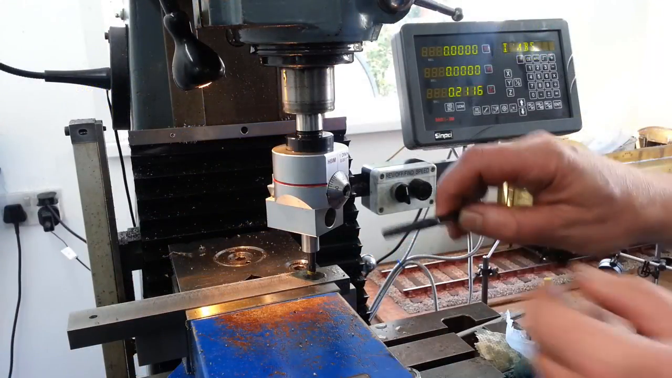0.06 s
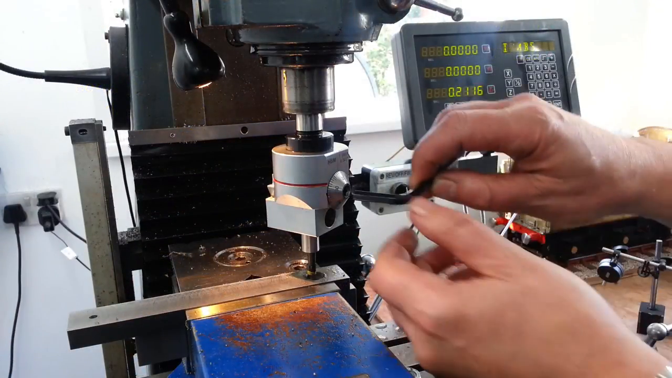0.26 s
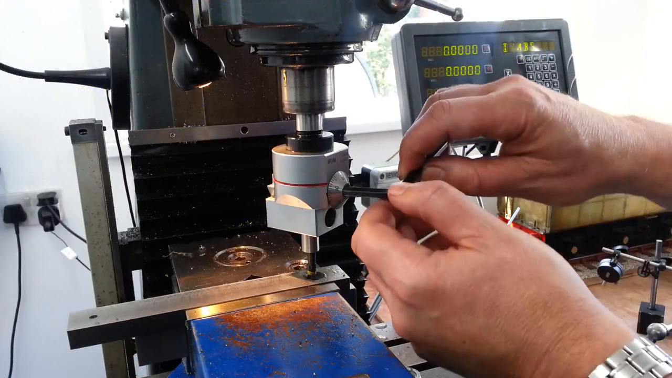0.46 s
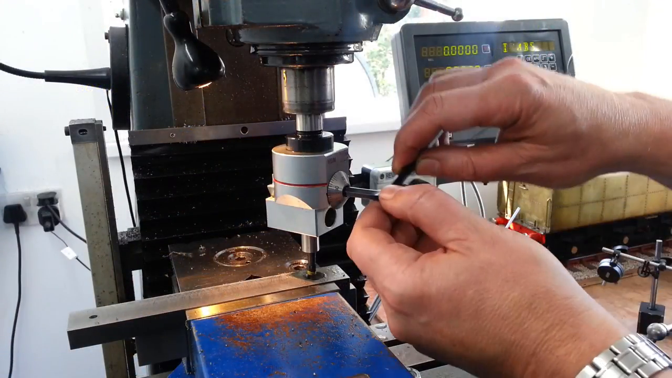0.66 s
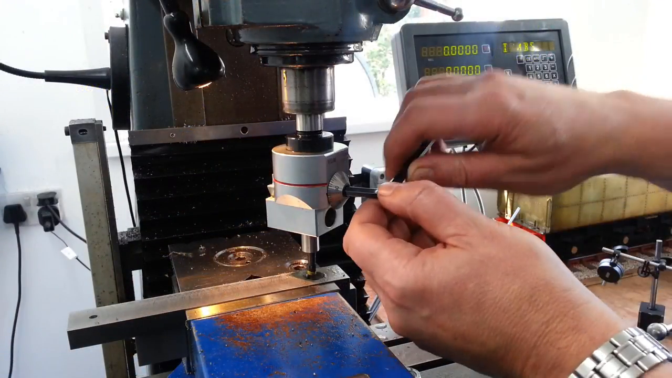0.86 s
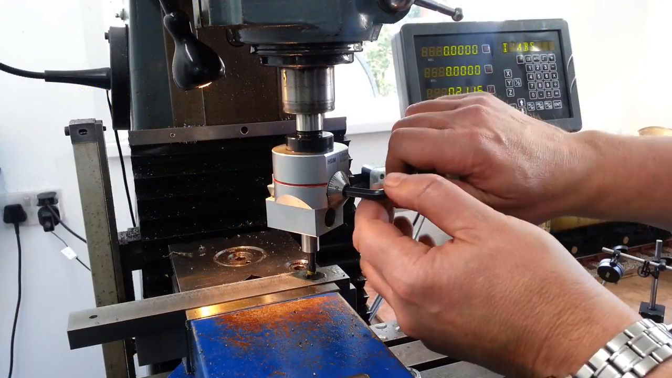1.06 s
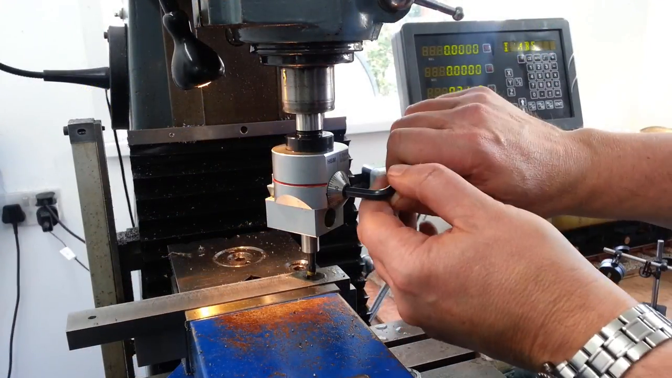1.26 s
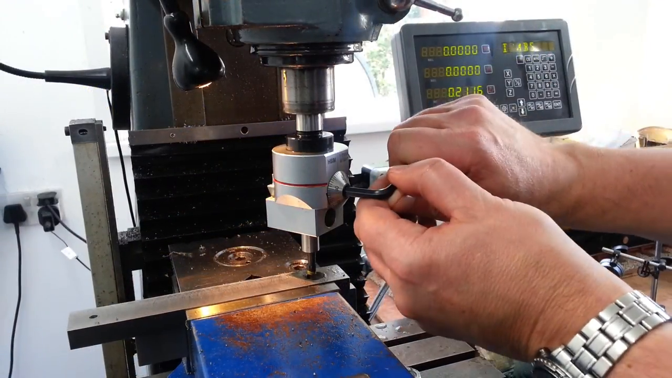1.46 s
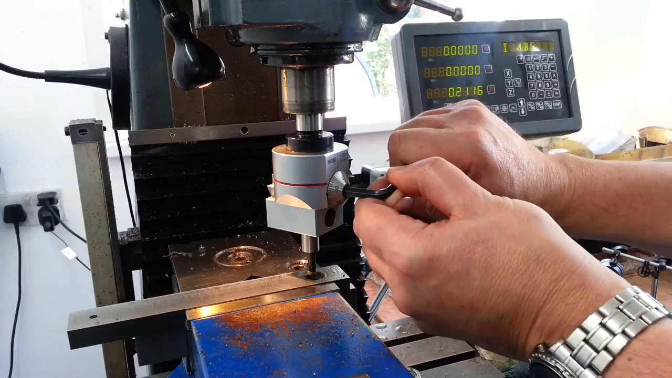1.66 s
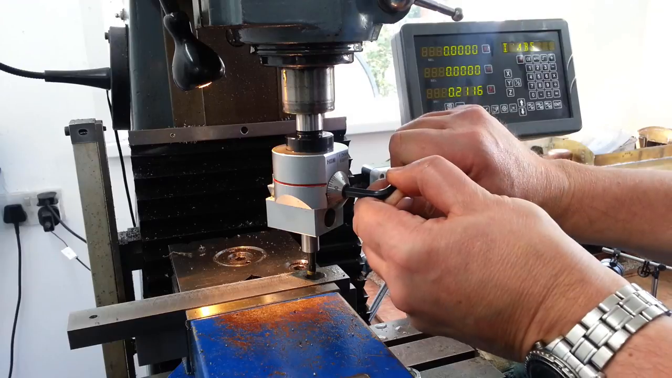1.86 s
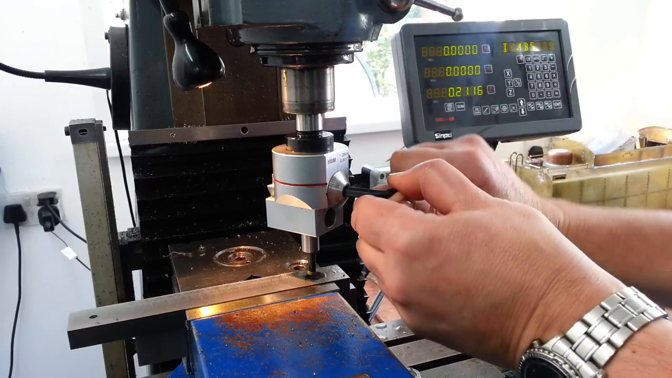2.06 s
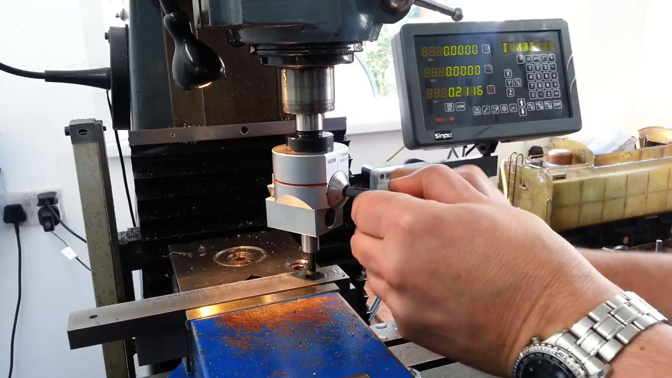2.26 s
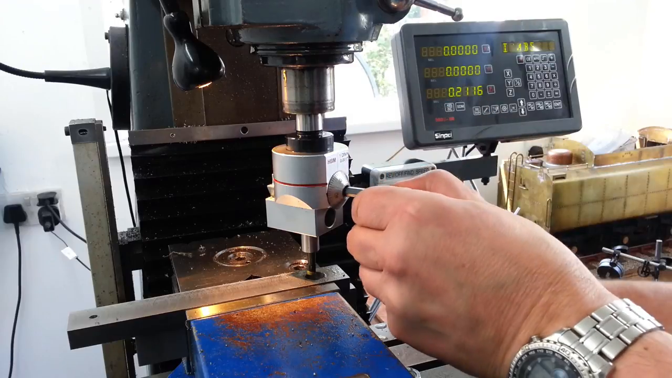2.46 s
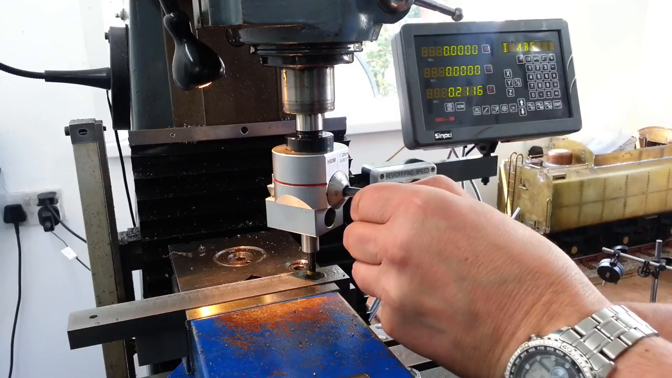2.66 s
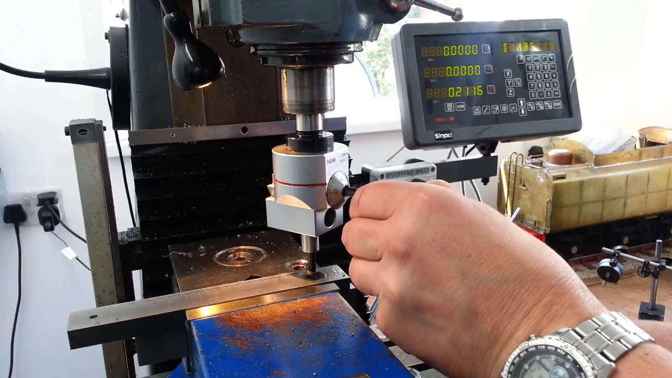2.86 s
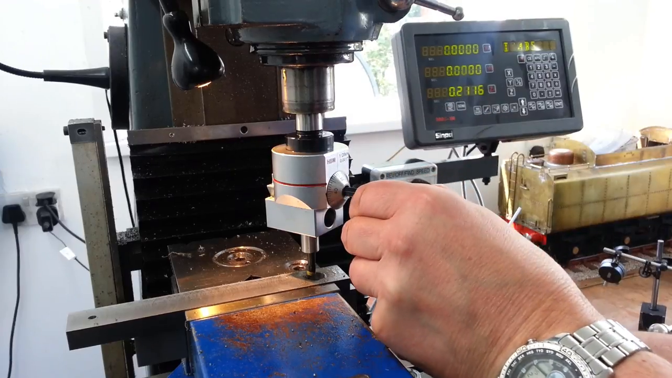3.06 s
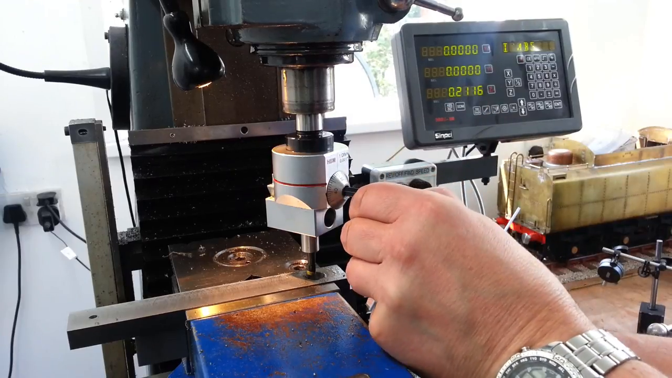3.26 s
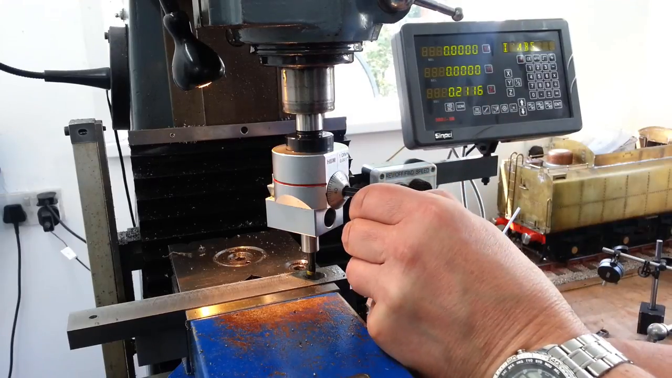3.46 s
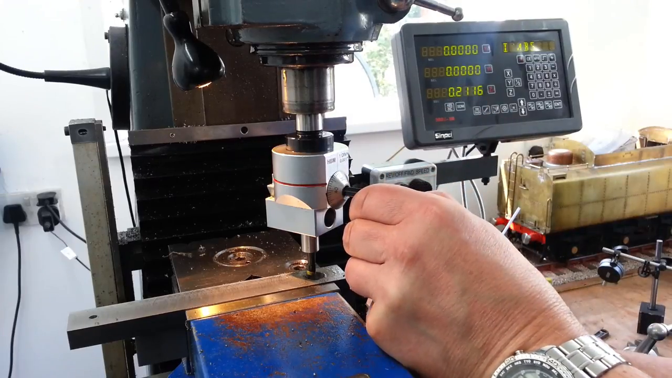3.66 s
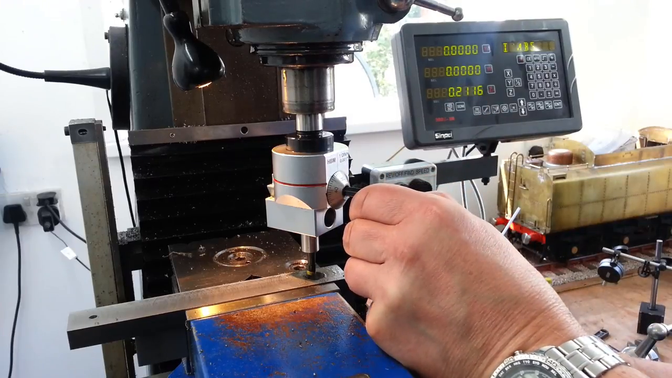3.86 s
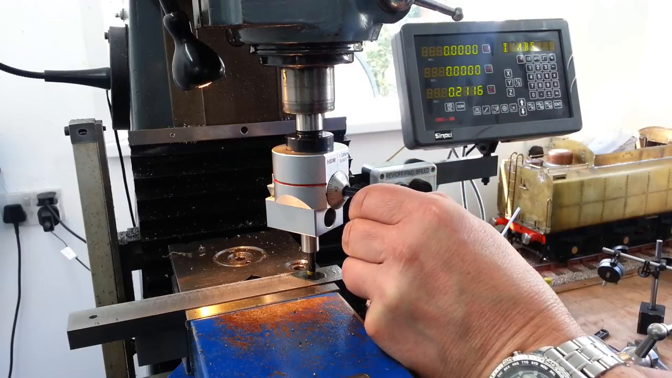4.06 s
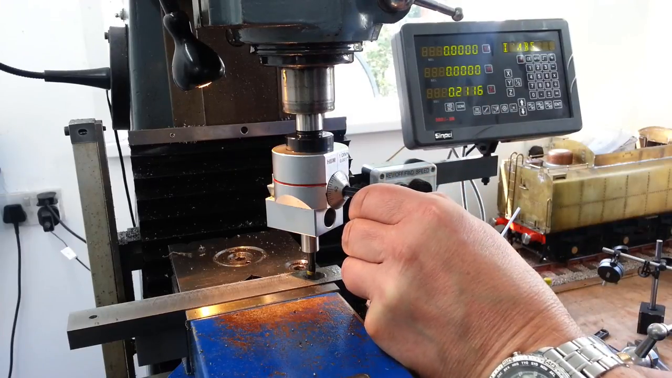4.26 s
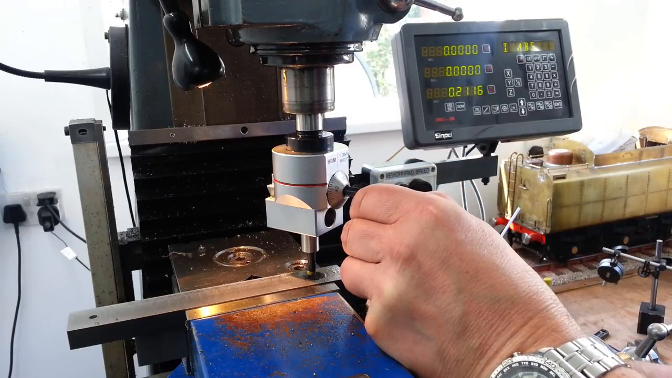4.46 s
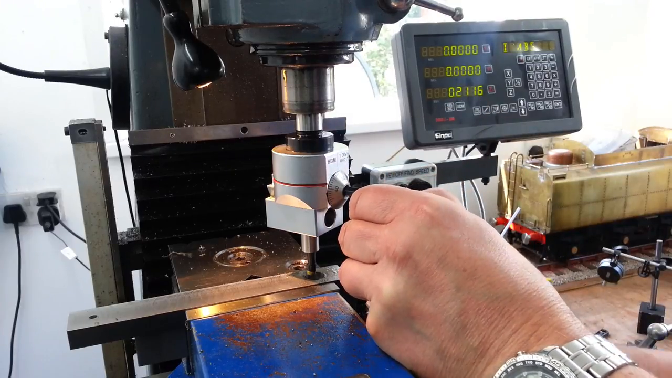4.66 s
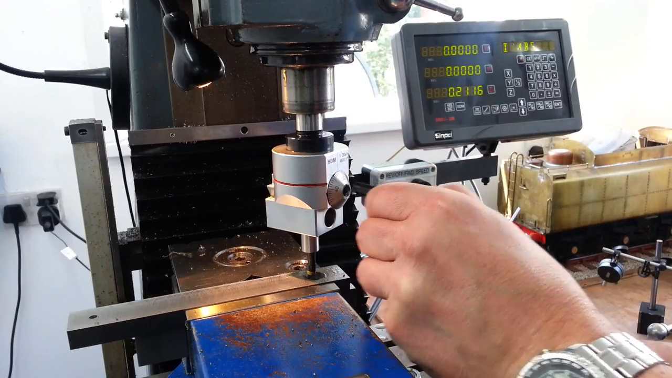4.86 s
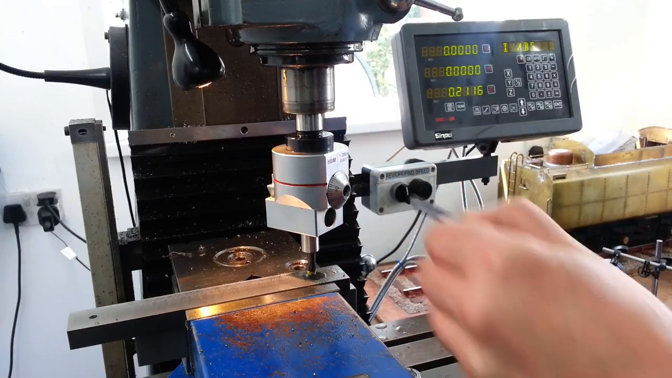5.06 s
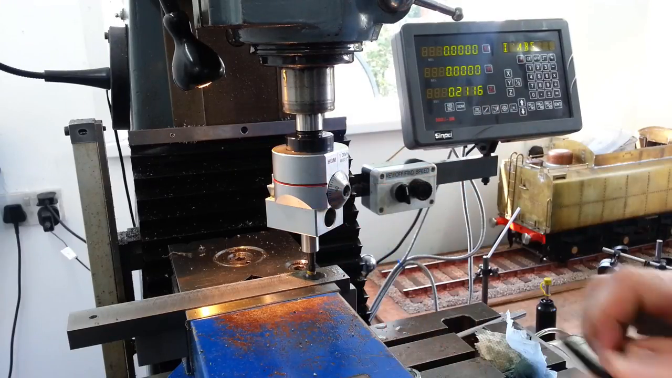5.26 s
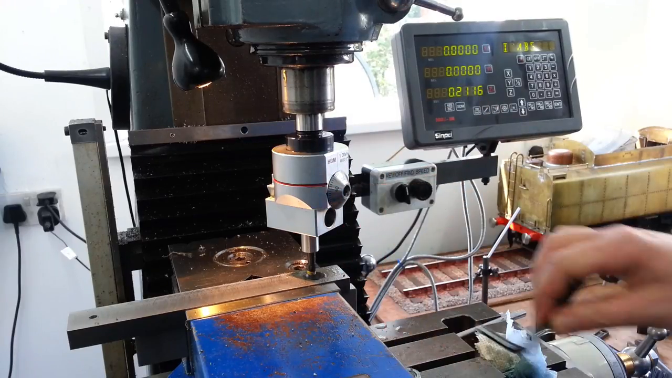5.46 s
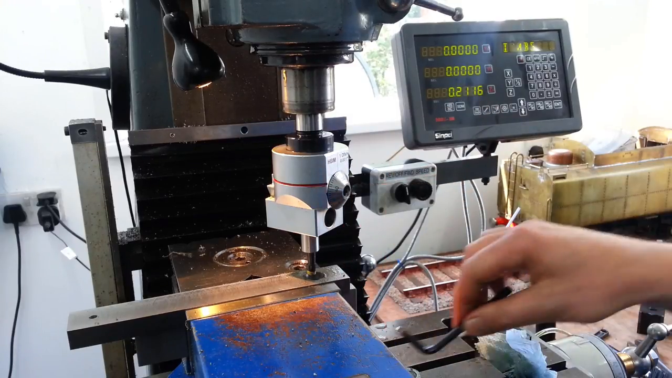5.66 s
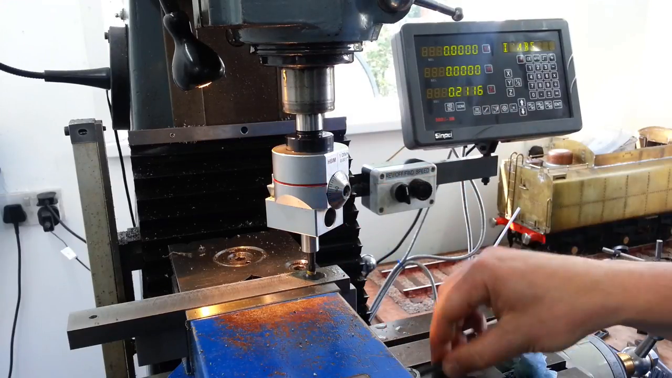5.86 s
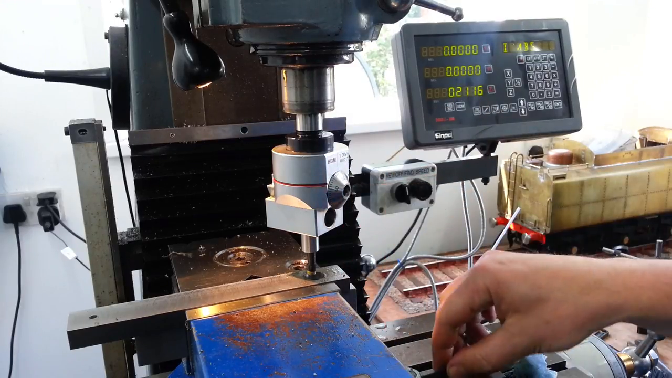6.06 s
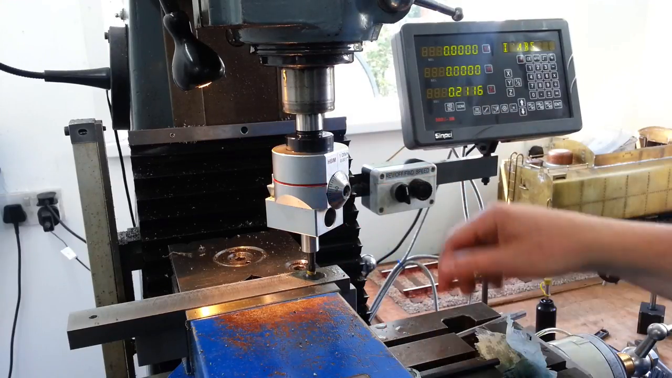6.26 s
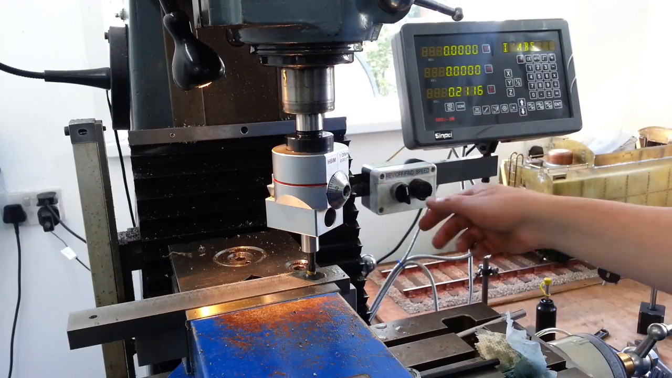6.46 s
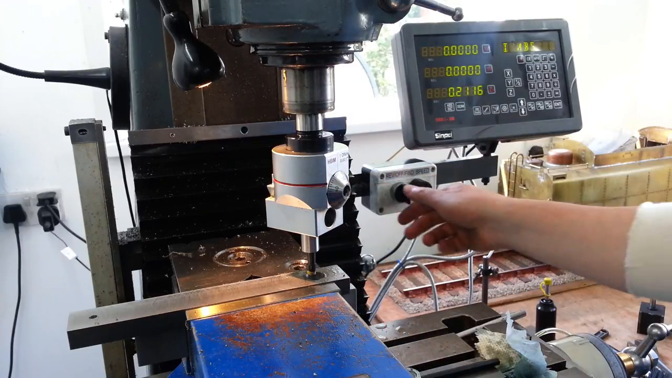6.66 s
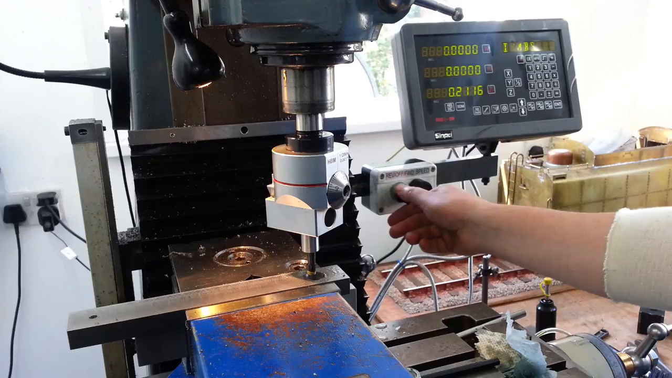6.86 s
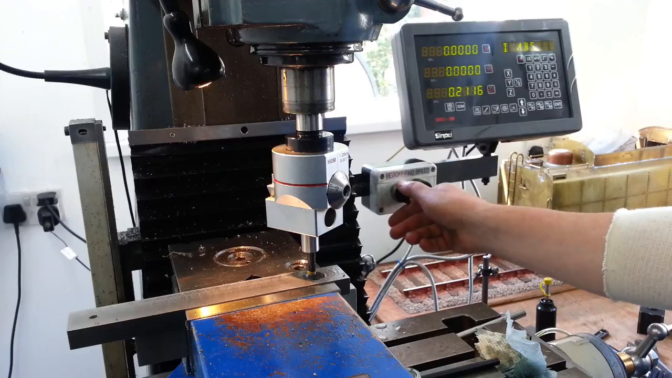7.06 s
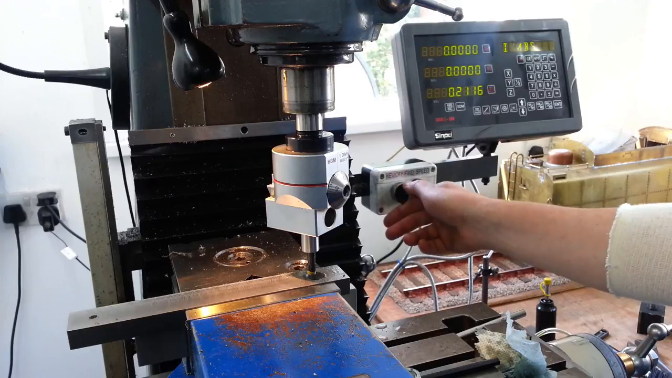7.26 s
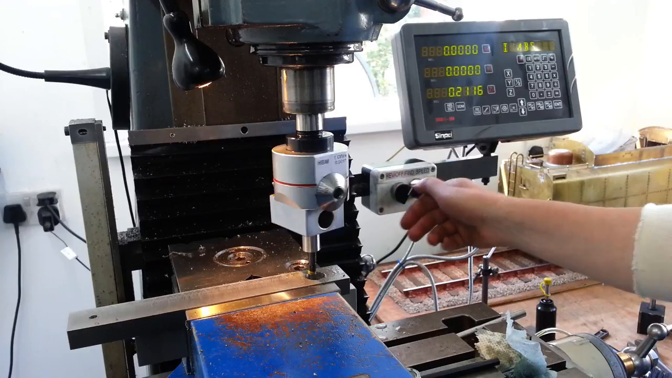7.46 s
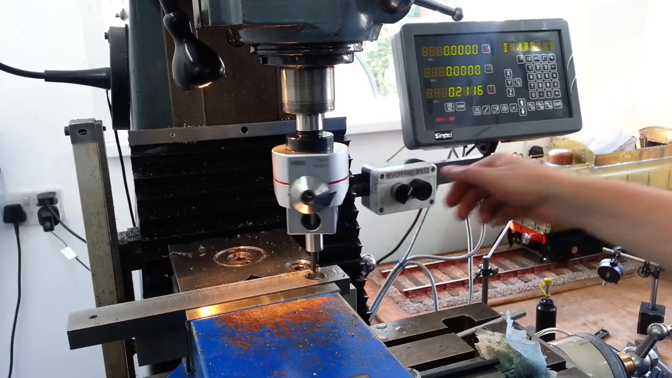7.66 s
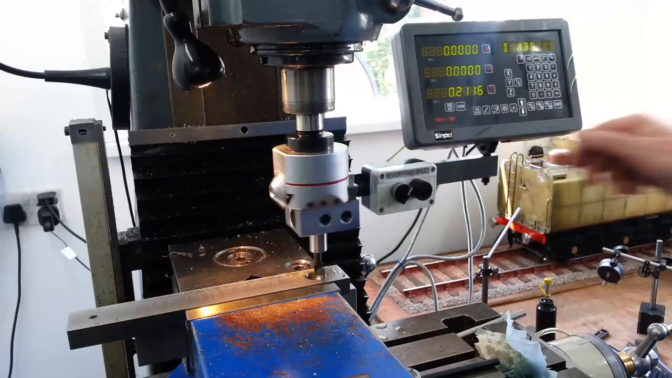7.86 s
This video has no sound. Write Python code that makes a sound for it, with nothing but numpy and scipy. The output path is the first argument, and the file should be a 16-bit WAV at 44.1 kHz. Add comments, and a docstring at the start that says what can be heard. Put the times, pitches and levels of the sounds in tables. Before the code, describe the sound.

A milling machine hums faintly in a small workshop. A hex key clicks against steel a few times, with soft hand bumps and arm rustle. After a lull it clicks again, then drops on the steel table with a short ringing bounce. A switch turns, a contactor snaps loudly, and a thin high whine begins as the gears knock into mesh and rumble. The sound is in stereo, with a short room echo.

```python
"""A milling machine idles in a small workshop, its iron cores humming with the mains.
Arms shuffle and hands bump as a hex key clicks into the boring head; later the key drops on the steel
table, bouncing and ringing. A switch is turned, a contactor slams and rings its cabinet, and the
inverter starts to whine. The spindle creeps, then the gears knock into mesh and run with a rumble."""
import sys
import numpy as np
from scipy import signal
from scipy.fft import rfft, irfft, next_fast_len
from scipy.io import wavfile
from scipy.ndimage import map_coordinates

SR = 44100
rng = np.random.default_rng(int(sys.argv[2]) if len(sys.argv) > 2 else 0)


def master(y):
    """Save y as 16-bit WAV."""
    cut = np.clip(np.atleast_2d(y).T, -1, 1)
    pcm = np.round(cut * 32767)  # scale
    wavfile.write(sys.argv[1], SR, pcm.astype(np.int16))


N = 349704
TIME = np.arange(N) / SR


def from_db(db):
    """Decibels to gain."""
    return 10 ** (np.asarray(db) / 20)


def rms_one(x):
    """Scale to rms 1."""
    return x / np.sqrt(np.mean(x ** 2) + 1e-20)


def pan(db):
    """Constant-power gains for a level difference; positive leans left."""
    return rms_one(from_db(np.array([[.5], [-.5]]) * db))


def at_hz(points, hz):
    """Read a curve on a log-frequency axis."""
    freqs, values = np.transpose(points)
    return np.interp(np.log(np.maximum(hz, 1)), np.log(freqs), values)


def ramp(start_s, rise_s):
    """Linear fade from 0 to 1, then hold."""
    return np.clip((TIME - start_s) / rise_s, 0, 1)


def since(start_s):
    """Seconds gone by after a cue, 0 before it."""
    return np.maximum(TIME - start_s, 0)


def drift(rate_hz):
    """Modulator that glides between random values of spread 1."""
    knots = rng.standard_normal(N // 40)
    return map_coordinates(knots, [TIME * rate_hz], order=1, mode="wrap")


def convolve(x, response):
    """Pass a signal through an impulse response."""
    return signal.oaconvolve(np.atleast_2d(x), np.atleast_2d(response), axes=1)[:, :N]


def colour(x, spectrum, size=4096):
    """Minimum-phase EQ of unit energy: the curve sets only the tone."""
    cepstrum = irfft(np.log(from_db(at_hz(spectrum, np.fft.rfftfreq(size, 1 / SR)))))
    causal = (np.arange(size) > 0) & (np.arange(size) < size // 2)
    response = irfft(np.exp(rfft(2 * cepstrum * causal)))
    return convolve(x, response / np.linalg.norm(response))


def clicks(times, db):
    """One impulse for each contact."""
    out = np.zeros(N)
    out[np.round(np.asarray(times) * SR).astype(int)] = from_db(db)
    return out


def ring(force, hz, t60):
    """One mode: each impulse starts a decaying sine."""
    radius, angle = from_db(-60 / (t60 * SR)), 2 * np.pi * hz / SR
    return signal.lfilter([.5, 0, -.5], [1, -2 * radius * np.cos(angle), radius ** 2], force + 1e-18)


def decay(force, t60):
    """Envelope of a vibration that stores each contact's energy and steadily loses it."""
    retained = from_db(-120 / (t60 * SR))
    return np.sqrt(signal.lfilter([1 - retained], [1, -retained], force ** 2 + 1e-18))


# Stereo image of the room: (frequency [Hz], left-right correlation [0-1])
ROOM_CORRELATION = [(40, 0.35), (130, 0.32), (300, 0.44), (640, 0.34), (1400, 0), (14000, 0.013)]
def stereo_noise(size):
    """Diffuse white noise: partly centred in the bass, fully wide in the treble."""
    fast = next_fast_len(size)
    mid, side = rfft(rng.standard_normal((2, fast)))
    alike = at_hz(ROOM_CORRELATION, np.fft.rfftfreq(fast, 1 / SR))
    return irfft(np.sqrt(1 + alike) * mid + np.sqrt(1 - alike) * side * [[1], [-1]], fast)[:, :size]


# Reverb time of the workshop: (frequency [Hz], T60 [s])
ROOM_DECAY = [(150, 0.54), (530, 0.94), (1400, 0.41), (3700, 0.38), (9000, 0.38), (14000, 0.2)]
def workshop(dry, wet_db, size=32768):
    """Direct sound plus reflections that build within milliseconds and die sooner in the treble."""
    hz, times, cells = signal.stft(stereo_noise(size), SR, nperseg=256)
    tail = signal.istft(cells * from_db(-60 * times / at_hz(ROOM_DECAY, hz)[:, None]), SR)[1]
    tail *= np.clip(TIME[:tail.shape[1]] / .006 - .3, 0, 1)
    tail /= np.linalg.norm(tail, axis=1, keepdims=True)
    return dry + from_db(wet_db) * convolve(dry.mean(axis=0), tail)


def rattle(force, t60, wet_db):
    """A dense noise burst on each contact, with a room tail that fades band by band."""
    size = next_fast_len(N)
    spectrum, hz = rfft(stereo_noise(size)), np.fft.rfftfreq(size, 1 / SR)
    centres, room_t60s = np.transpose(ROOM_DECAY)
    tail = np.zeros((2, N))
    for band, room_t60 in zip(np.eye(len(centres)), room_t60s):
        band_noise = irfft(spectrum * at_hz(np.c_[centres, band], hz), size)[:, :N]
        tail += band_noise * decay(force, room_t60)
    return stereo_noise(N) * decay(force, t60) + from_db(wet_db) * tail


# Strong hum partials: (multiple of twice the mains rate, level [dB], pan [dB])
CORE_PARTIALS = [(1, -74, -8), (2, -58, 0), (3, -66, 1), (4, -63, -2), (5, -68, -8), (6, -55, -5),
                 (8, -70, 4), (11, -70, 10), (13, -71, 0), (15, -72, 0), (17, -74, -4), (18, -73, -4),
                 (25, -69, 3), (26, -70, 4), (27, -72, -5), (28, -64, -4), (29, -74, -10), (30, -73, 7),
                 (32, -66, 3), (34, -73, 3), (35, -68, -10), (36, -68, -10), (37, -71, -6), (38, -73, -7)]
# Buzz of the weaker partials: (frequency [Hz], level [dB])
CORE_BUZZ = [(700, -84), (1500, -78.5), (2200, -79), (3300, -71), (4000, -81.5), (4600, -80), (6000, -89.5),
             (7300, -95)]
# Standing waves make the left side lag: (frequency [Hz], delay [s])
LEFT_DELAY = [(600, .00014), (800, .00043), (2600, .00049), (2800, .00038), (3200, .00045), (3400, .00028)]
def mains_hum(mains_hz=49.924, trim_db=.12, odd_db=-16, waver_db_at_1khz=.9):
    """Iron cores flex twice per mains cycle; panels favour some partials, moving arms make them waver."""
    strong = {2 * round(multiple): (db, side) for multiple, db, side in CORE_PARTIALS}
    hand_near = ramp(.63, .46) - ramp(5.5, .46)
    out = np.zeros((2, N))
    for harmonic in [*range(2, 96), *range(96, 148, 2)]:
        hz = harmonic * mains_hz
        buzz_db = at_hz(CORE_BUZZ, hz) + odd_db * (harmonic % 2)
        db, pan_db = strong.get(harmonic, (buzz_db, rng.normal(0, 5)))
        phase = 2 * np.pi * (hz * TIME + rng.random())
        # standing waves scatter the stereo phase of the weak partials
        lag = 2 * np.pi * hz * at_hz(LEFT_DELAY, hz) + rng.normal(0, 2.7) * (harmonic not in strong)
        waver_db = waver_db_at_1khz * np.sqrt(hz / 1000) * rng.standard_normal(24)
        gain = np.interp(TIME, np.linspace(0, N / SR, len(waver_db)), from_db(db + trim_db + waver_db))
        if harmonic == 12:   # the loudest partial loses its boost while the hand holds the key
            gain *= from_db(2.5 * (1 - hand_near))
        out += np.sqrt(2) * pan(pan_db) * gain * np.sin([phase - lag, phase])
    return out


# Soft rustle of the arms: (frequency [Hz], level [dB])
SHUFFLE_EQ = [(100, -35), (250, 2.5), (450, 2), (700, 1), (1050, 0.5), (1500, -11), (4000, -12),
              (9000, -35)]
def arm_shuffle(reach_db=-56, settle_db_per_s=2.1, rest_db=-62.5, flutter_db=2.5):
    """Arms shuffle most as they reach in, then settle."""
    level_db = np.maximum(reach_db - settle_db_per_s * TIME, rest_db)
    return from_db(level_db + flutter_db * drift(52)) * colour(stereo_noise(N), SHUFFLE_EQ)


# Room tone: (frequency [Hz], level [dB])
AIR_EQ = [(25, -14), (55, -13.5), (110, 0.5), (170, 0), (300, 3.5), (450, -6.5), (700, -17), (1100, -3),
          (1500, -8.5), (3500, -12), (5000, -14.5), (6300, -19.5), (7500, -15), (14000, -14.5)]
def room_air(level_db=-58):
    """A steady bed of air and hiss."""
    return from_db(level_db) * colour(stereo_noise(N), AIR_EQ)


def key_ring(modes, times, ring_db, tilt_db):
    """The key's bending modes; each contact rings with its own brightness, pivoting at 6 kHz."""
    out = np.zeros((2, N))
    for hz, db, t60, pan_db in modes:
        force = clicks(times, ring_db + db + tilt_db * np.log2(hz / 6000))
        out += pan(pan_db) * ring(force, hz, t60)
    return out


# Key touching the socket: (time [s], click level [dB], ring level [dB], ring tilt [dB/octave])
SOCKET_HITS = [(0.347, -14, -34, -9.5), (0.4927, -22, -42, -14.5), (0.498, -17, -45, -13),
               (.508, -11.5, -41, -11), (0.7969, -9.5, -46, -7), (4.816, -29, -51, -10),
               (4.829, -19, -34, 7), (4.8348, -16, -34, 7)]
# Bright steel-on-steel click: (frequency [Hz], level [dB])
SOCKET_EQ = [(100, -83), (500, -51), (1300, 1), (1900, 10), (3000, 11.5), (4400, 14), (5800, 4),
             (7000, 5.5), (8400, 10), (9700, 3), (12000, -5), (14400, 6.5)]
# Ring of the held key: (frequency [Hz], level [dB], T60 [s], pan [dB])
HELD_KEY_MODES = [(1860, -28.5, 0.074, -2), (2970, -12, 0.034, -2), (3430, -6.5, 0.031, 4),
                  (4070, -7, 0.095, 0), (4170, -10.5, .1, 0), (4840, -18.5, 0.06, 0),
                  (7900, -7.5, 0.063, 0), (8370, -8, 0.082, 0), (8560, -12, 0.1, 0), (8850, -16, 0.098, -2)]
def key_in_socket():
    """The key clicks and rings briefly against the boring head, going in and coming out."""
    times, click_db, ring_db, tilt_db = np.transpose(SOCKET_HITS)
    click = colour(rattle(clicks(times, click_db), t60=.016, wet_db=-.5), SOCKET_EQ)
    return click + workshop(key_ring(HELD_KEY_MODES, times, ring_db, tilt_db), wet_db=-2.5)


# Knocks of the hands: (time [s], level [dB])
HAND_HITS = [(.355, -21.5), (0.504, -15.5), (.645, -16.5), (.805, -15.5), (3.549, -18)]
# Their dull body: (frequency [Hz], level [dB])
HAND_EQ = [(100, -25), (250, -1.5), (450, 6), (700, 1), (900, 0.5), (1300, -14), (4000, -28), (9000, -40)]
def hand_bumps():
    """Hands bump the machine with soft, lingering thuds."""
    force = clicks(*np.transpose(HAND_HITS))
    return colour(stereo_noise(N) * decay(force, t60=.56), HAND_EQ)


# Bounces: (time [s], click level [dB], flatwise ring [dB], edgewise ring [dB], ring tilt [dB/octave])
TABLE_BOUNCES = [(5.7787, -12.5, -26, -35, 0.5), (5.829, -27, -50, -41, -9.5),
                 (5.843, -32, -44.5, -39.5, -9.5), (5.9046, -30, -40, -43, -4),
                 (5.9348, -3, -31, -20.5, 6.5), (5.953, -3, -29, -33.5, -4)]
# Clack on the table: (frequency [Hz], level [dB])
TABLE_EQ = [(100, -51), (500, -4.5), (1300, -6.5), (1900, -3.5), (3000, 1.5), (4400, 1.5), (6000, -10),
            (8400, 5), (10000, -2), (14400, 0.5)]
# The key bending across its plane, then within it: (frequency [Hz], level [dB], T60 [s], pan [dB])
KEY_FLATWISE = [(1828, -16, 0.099, -1), (4016, -5, 0.11, 20), (4080, -14, 0.077, 4), (8260, -9, 0.067, 17),
                (8850, -7, 0.069, 4)]
KEY_EDGEWISE = [(2968, 3, 0.072, -10), (3054, -6, 0.053, 0), (7880, -8, 0.18, 7), (14410, 4, 0.1, 16)]
def key_drop():
    """The L-shaped key bounces on the steel table; its ring depends on which way it lands."""
    times, click_db, flatwise_db, edgewise_db, tilt_db = np.transpose(TABLE_BOUNCES)
    clack = colour(rattle(clicks(times, click_db), t60=.07, wet_db=1.3), TABLE_EQ)
    flatwise = key_ring(KEY_FLATWISE, times, flatwise_db, tilt_db)
    edgewise = key_ring(KEY_EDGEWISE, times, edgewise_db, tilt_db)
    return clack + workshop(flatwise + edgewise, wet_db=.5)


# Switch detents, then the contactor slamming and bouncing: (time [s], level [dB])
SWITCH_CONTACTS = [(6.765, -27), (6.77, -21.5), (6.931, -26.5), (7.186, 4), (7.189, 10), (7.194, -2.5),
                   (7.2045, 6), (7.216, 3.5), (7.358, -16), (7.536, -23)]
# Snap of the housing: (frequency [Hz], level [dB])
HOUSING_EQ = [(60, -55), (190, -7.5), (300, -24), (460, -7), (950, -1), (1600, 4), (2000, 11), (2450, 9.5),
              (2950, 5), (3800, 6), (4800, -4), (5900, -12), (9800, -12), (14000, -16)]
# Ring of the cabinet panels: (frequency [Hz], level [dB], T60 [s], pan [dB])
PANEL_MODES = [(452.5, -52, 0.3, 4), (764, -49, .2, 0), (1090, -48, 0.33, 2), (1393, -35.5, .22, -10),
               (1924, -36, .17, 6), (2115, -38, .17, 0), (2380, -35, .14, -6), (2790, -43, .18, 0),
               (3440, -49, .09, 4)]
def switchgear():
    """Each contact rattles the housing and rings the steel cabinet around it."""
    force = clicks(*np.transpose(SWITCH_CONTACTS))
    panels = sum(pan(side) * from_db(db) * ring(force, hz, t60) for hz, db, t60, side in PANEL_MODES)
    return colour(rattle(force, t60=.075, wet_db=.5), HOUSING_EQ) + panels


def inverter_whine(on_s, load_s, switching_hz=7980, width_hz=75, base_db=-60.5, swell_db_per_s=29):
    """The inverter sings in a narrow band at its switching rate, swelling once the gears take the load."""
    surge_db = 10 * np.exp(-since(on_s) / .2)   # brief inrush of current
    level_db = base_db + surge_db + swell_db_per_s * since(load_s)
    carrier = np.exp(2j * np.pi * switching_hz * TIME)
    wobbles = [drift(width_hz) + 1j * drift(width_hz) for side in range(2)]
    whine = np.array([rms_one(np.real(carrier * wobble)) for wobble in wobbles])
    return ramp(on_s, .04) * from_db(level_db) * whine


# Gear rumble through the head casting: (frequency [Hz], level [dB])
RUMBLE_EQ = [(60, -32), (140, -32), (210, -7), (310, -1), (390, 7.5), (480, 1.5), (620, 0.5), (900, -2.5),
             (1200, -18), (1360, -3), (1900, -18.5), (3500, -19), (6000, -34), (14000, -37)]
def gear_rumble(creep_s, engage_s, creep_db=-47, run_db=-38.5, rough_db=.1):
    """The spindle creeps with the gears slack, then they engage with a jolt and run."""
    creep = from_db(creep_db) * ramp(creep_s, .04)
    run = from_db(run_db) * ramp(engage_s, .0098)
    roughness = from_db(rough_db * drift(100))
    return colour(np.hypot(creep, run) * roughness * stereo_noise(N), RUMBLE_EQ)


# Gear teeth meeting: (time [s], level [dB])
TOOTH_HITS = [(7.701, -7.5), (7.7102, -5), (7.7272, -1.5), (7.762, -8), (7.853, -13), (7.892, -12.5)]
# Their low clunk: (frequency [Hz], level [dB])
TOOTH_EQ = [(80, -46), (220, -14.5), (390, 3.5), (600, -6), (800, 0.5), (1020, -2), (1250, -27),
            (3500, -30.5), (8000, -73)]
def gear_knocks():
    """Teeth take up their slack and knock through the head casting."""
    force = clicks(*np.transpose(TOOTH_HITS))
    return colour(rattle(force, t60=.13, wet_db=-2.5), TOOTH_EQ)


def scene():
    """The idle bed, the key handling and the start-up, mixed in stereo."""
    engage_s = 7.69
    bed = mains_hum() + arm_shuffle() + room_air()
    handling = key_in_socket() + hand_bumps() + key_drop()
    electrics = switchgear() + inverter_whine(on_s=7.275, load_s=engage_s)
    gears = gear_rumble(creep_s=7.47, engage_s=engage_s) + gear_knocks()
    return bed + handling + electrics + gears


def record(dry, cutoff_hz=14550):
    """A steep low-pass takes off the very top."""
    return signal.sosfilt(signal.ellip(12, .1, 80, cutoff_hz, fs=SR, output="sos"), dry)


dry = scene()
out = record(dry)
master(out)
```